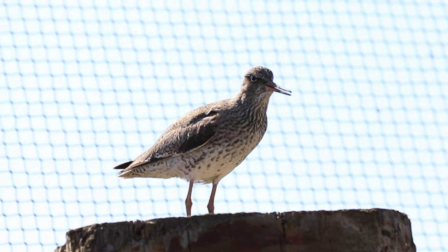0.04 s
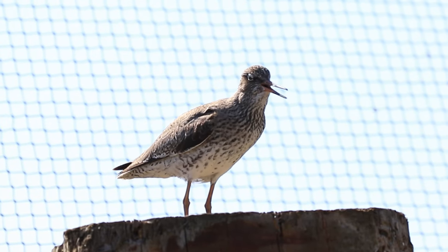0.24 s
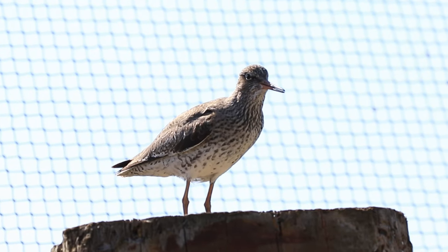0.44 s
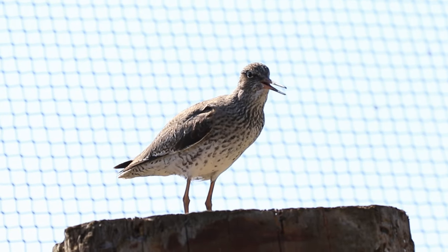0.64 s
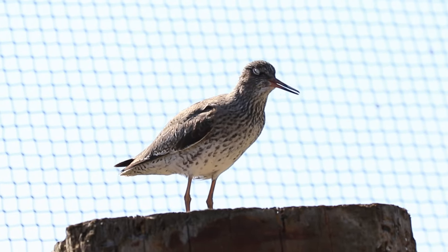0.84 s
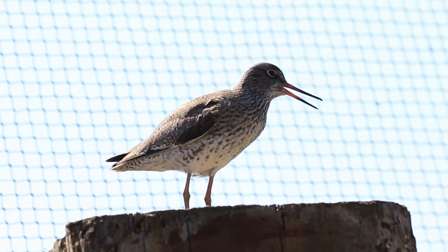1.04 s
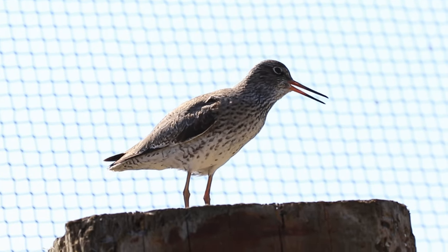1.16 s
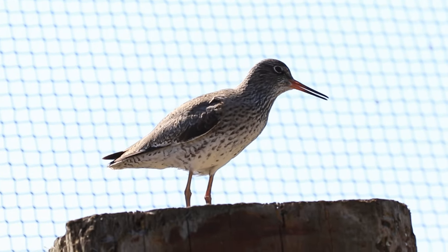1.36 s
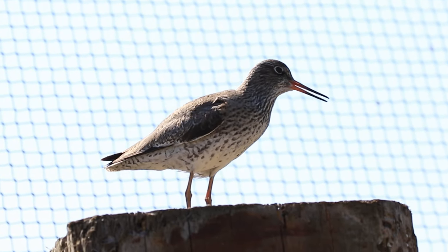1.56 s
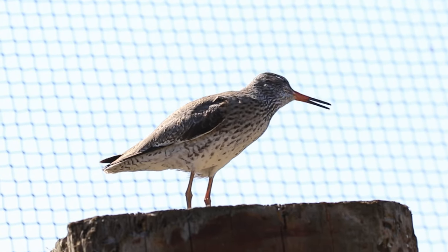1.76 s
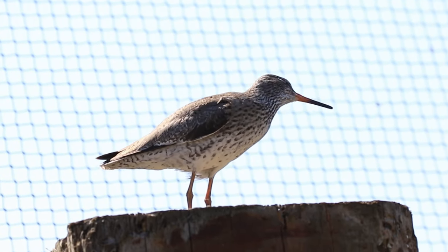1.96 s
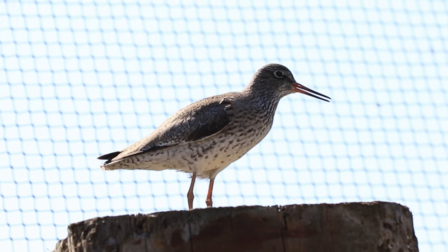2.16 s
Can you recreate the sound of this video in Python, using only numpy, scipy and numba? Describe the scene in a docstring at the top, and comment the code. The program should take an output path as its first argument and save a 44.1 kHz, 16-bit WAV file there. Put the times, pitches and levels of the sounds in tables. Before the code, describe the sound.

Close by outdoors, a wading bird pipes four short, high whistles, each starting with a tiny rasp and echoing briefly. Gusts rumble on the microphone with two soft thumps midway, over quiet air and faint distant chirps.

```python
"""A wading bird in an aviary

The bird whistles four times, close by. Each call opens with a short rasp and a reedy upslide, breaks
into a nearly pure tone that sags and recovers, and drops away. A wall reflects it and the aviary
reverberates. Other birds call faintly further off, and wind buffets the microphone over quiet air."""
import sys
import numpy as np
from scipy import signal
from scipy.fft import rfft, irfft
from scipy.io import wavfile
from scipy.ndimage import uniform_filter1d, minimum_filter1d
from numba import njit

SR = 44100
rng = np.random.default_rng(int(sys.argv[2]) if len(sys.argv) > 2 else 0)


def dump(signal):
    """Clip the signal to [-1, 1] and save it as 16-bit WAV at the path in sys.argv[1]."""
    limited = np.clip(np.atleast_2d(signal).T, -1, 1)
    pcm = np.round(limited * 32767).astype(np.int16)
    wavfile.write(sys.argv[1], SR, pcm)


N = 97020
T = np.arange(N) / SR
BREAK_S = .0025  # the upslide gives way to the pure tone within this time

# Pitch contour of a whistle (time after the break [s], frequency [Hz])
GLIDE = [(0, 2675), (.008, 2592), (.02, 2458), (.035, 2364), (.06, 2322), (.08, 2333), (.1, 2370),
         (.135, 2387), (.17, 2418), (.2, 2406)]
# Loudness contour of a whistle (share of its length [1], gain [dB])
EFFORT = [(0, 7.5), (.055, 6), (.115, 0.1), (.3, -0.95), (.5, -0.5), (.72, -0.5), (.9, -2.5), (1, -3.2)]
def whistle(t, length, offset_hz, rise_hz, db, swell_db, third_db, fourth_db, drop_db,
            drop_hz=700, drop_s=.0055, beak_close_s=.05, release_s=.008, fade_s=.006):
    """Frequency modulation: a tone sags, recovers and drops; upper harmonics fade as the beak closes."""
    late = np.maximum(t - length, 0)
    glide = curve(t, GLIDE)
    hz = (glide + offset_hz + rise_hz * ramp(t / length)) * (1 + .0035 * walk(83))
    hz -= drop_hz * (1 - np.exp(-late / drop_s))
    closing = ramp((t - length) / beak_close_s + 1)
    sag_db = 2 * ramp((GLIDE[-1][1] - glide) / 80)  # overtones gain a little where the pitch sags
    build_db = -12.5 * (1 - ramp(t / .02))
    fourth = fourth_db - 14 * closing + build_db + sag_db / 2 + 2 * walk(25)
    second = -41 + sag_db + 18 * ramp(late / drop_s) + 2 * walk(25)
    third = third_db - 7 * closing + 2 * walk(6.7)
    top = fourth + 8 * (1 - ramp(t / .055))  # the highest harmonics are strongest early
    tone = voice(hz, [0, second, third, fourth, top - 10, top - 18.5])
    held = ramp((length - t) / release_s + .5)
    envelope = ramp(t / BREAK_S) * (held + (1 - held) * amp(drop_db) * np.exp(-late / fade_s))
    swell = swell_db * ramp((t / length - .3) / .21)
    return tone * envelope * amp(db + curve(t / length, EFFORT) + swell + 1.86 * walk(20))


# Harmonics of the rasp, from the fundamental up (relative level [dB])
RASP_HARMONICS = [-13.5, -5, 0, -15, -20.5, -25.5, -34, -27.5, -27, -48, -47.5, -54]
# Pitch contour of the upslide (time before the break [s], frequency [Hz])
UPSLIDE = [(.0155, 2085), (.010, 2115), (.005, 2210), (0, 2420)]
# Harmonics of the upslide, from the second up (relative level [dB])
UPSLIDE_OVERTONES = [-9, -19, -28, -42, -53.5, -58]
# Spectrum of the crack at the break (frequency [Hz], relative level [dB])
CRACK_SPECTRUM = [(1000, -38), (2400, -8), (4700, 0.5), (6200, -12), (9300, -1), (11000, -23),
                  (12700, -17.5), (15000, -44)]
def onset(t, rasp_hz=1100, rasp_lead_s=.0238, rasp_s=.0098, edge_s=.00093, flare_s=.00093, crack_s=.0022):
    """Attack transient: jitter and shimmer roughen a rasp and an upslide, then the voice cracks."""
    rasp = voice(rasp_hz * (1 + .0349 * walk(900)), RASP_HARMONICS)
    rasp *= ramp((t + rasp_lead_s) / edge_s) * ramp((rasp_s - rasp_lead_s - t) / edge_s) * amp(-26.5)
    flare_db = 4 * np.exp(-(t / flare_s) ** 2)  # overtones and jitter flare at the break
    hz = curve(-t, UPSLIDE[::-1]) * (1 + .007 * amp(flare_db) * walk(600))
    slide = voice(hz, [0] + [db + flare_db for db in UPSLIDE_OVERTONES])
    slide *= ramp((t + UPSLIDE[0][0]) / edge_s) * ramp(-t / BREAK_S + .5) * amp(-21)
    crack = noise(CRACK_SPECTRUM) * np.exp(-(t / crack_s) ** 2) * amp(-30)
    return (rasp + slide) * amp(2.4 * walk(430)) + crack


# Calls (time of the break [s], length [s], pitch offset [Hz], pitch rise [Hz], base level [dB],
# swell [dB], third harmonic [dB], fourth harmonic [dB], closing drop [dB])
CALLS = [(.1845, .195, 24, -30, -14.3, 3.4, -45, -36, -17), (.6732, .194, 1, -1, -14, 3.3, -46, -36, -13),
         (1.1262, .201, -7, 14, -14.8, -.3, -32, -38.5, -13),
         (1.6882, .2315, -1, 5, -15, -.3, -35, -30, -20)]
def wading_bird():
    """Superposition: each call is a rough transient joined to a sustained whistle."""
    return sum(onset(T - time) + whistle(T - time, *shape) for time, *shape in CALLS)


# Discrete reflections (delay [s], gain [dB])
ECHOES = [(0.019, -19), (0.0424, -28.5), (0.0902, -17.5), (0.1504, -32)]
def aviary(x, t60_s=.7, tail_db=-26.5, cutoff_hz=3870):
    """Reflection: distinct echoes and a diffuse tail return duller than the direct sound."""
    wet = reverb(x, t60_s, build_s=.04) * amp(tail_db)
    for delay, db in ECHOES:
        wet += amp(db) * np.pad(x, (int(delay * SR), 0))[:N]
    return lowpass(wet, cutoff_hz)


# Distant chirps (time [s], length [s], start pitch [Hz], end pitch [Hz], level [dB],
# second harmonic [dB], third harmonic [dB])
CHIRPS = [(1.961, 0.023, 3035, 2703, -32.5, -42, -14.5), (1.984, 0.019, 3793, 3600, -44, -7, -34),
          (2.004, 0.0257, 3000, 2680, -51.5, -40, -2), (2.034, 0.037, 5890, 4600, -56, -30, -30),
          (2.057, 0.096, 4750, 4655, -56.5, -26, -30), (0.4, .06, 3700, 1800, -48.5, -22.5, -13.5),
          (0.37, 0.027, 1400, 1300, -54, -27, -29), (0.61, .11, 2200, 2162, -55.5, -17.5, -30),
          (1.052, .04, 6280, 5270, -57.5, -30, -28), (1.36, .11, 8400, 8220, -62.5, -40, -38),
          (2.171, 0.0224, 2400, 2343, -37, -33, -31)]
# Harmonics of the distant honk, from the fundamental up (relative level [dB])
HONK_HARMONICS = [-24, -20, 1, -7.5, 2.5, -14, -3.5]
def other_birds(edge_s=.0017, honk_start_s=.31, honk_s=.22, honk_hz=263.6, cutoff_hz=3870):
    """Reverberant field: distance blurs slurred chirps and one honk, adding a strong, dull tail."""
    direct = np.zeros(N)
    for start, length, from_hz, to_hz, db, second_db, third_db in CHIRPS:
        t = T - start
        hz = (from_hz + (to_hz - from_hz) * ramp(t / length)) * (1 + .0054 * walk(120))
        envelope = ramp(t / edge_s) * ramp((length - t) / edge_s)
        direct += voice(hz, [0, second_db, third_db]) * envelope * amp(db)
    progress = (T - honk_start_s) / honk_s
    hz = (honk_hz - 12 * ramp(progress)) * (1 + .0023 * walk(69))
    direct += voice(hz, HONK_HARMONICS) * ramp(progress * 10) * ramp((1 - progress) * 2) * amp(-47)
    return direct + lowpass(reverb(direct, t60_s=.42, build_s=.0033), cutoff_hz)


# Gust envelope (time [s], level [dB])
GUSTS = [(0, -54.5), (.16, -40.5), (.22, -71), (.41, -46), (.475, -27.5), (.52, -46.5), (.57, -29.5),
         (.7, -43.5), (.88, -36.5), (1.05, -42), (1.18, -34), (1.245, -21), (1.27, -24), (1.405, -16.5),
         (1.49, -31), (1.525, -23), (1.575, -39), (1.625, -25), (1.77, -50), (1.85, -25), (1.885, -23.5),
         (1.915, -63), (2.15, -46.5), (2.19, -27)]
# Spectrum of the eddies (frequency [Hz], relative level [dB])
WIND_SPECTRUM = [(15, -38), (25, -22), (96, -4), (179, -5), (329, -11.5), (536, -19.5), (603, -25.5),
                 (934, -33), (1050, -50.5), (1400, -39.5), (1820, -70.5), (3080, -120)]
# Pressure pulses of wind on the microphone (time [s], width [s], level [dB])
THUMPS = [(1.009, 0.0014, -6), (1.0931, 0.0014, -12.5)]
def wind(dull_hz=207, fully_bright_db=-18.5, flutter_db=3.08, grit_db=-6):
    """Turbulence at the microphone: a fluttering rumble that brightens in strong gusts, and thumps."""
    gust_db = curve(T, GUSTS)
    eddies = noise(WIND_SPECTRUM)
    dull = lowpass(noise(WIND_SPECTRUM), dull_hz)
    brightness = ramp(1 + (gust_db - fully_bright_db) / 10)
    rumble = np.sqrt(brightness) * eddies + np.sqrt(1 - brightness) * dull / dull.std()
    pressure = rumble * amp(gust_db + flutter_db * walk(24))
    for time, width, db in THUMPS:
        u = (T - time) / width
        pressure += amp(db) * np.exp(-u ** 2 / 2) * (u ** 2 - 1 + amp(grit_db) * eddies)
    return pressure


# Spectrum of the outdoor air (frequency [Hz], relative level [dB])
AIR_SPECTRUM = [(25, -25), (70, -7), (200, -2), (500, -2), (1000, -4.5), (2000, -6), (3300, -13),
                (5000, -20.5), (9000, -25), (12000, -34), (16000, -34)]
def background(air_db=-42.5, ring_hz=2370, bandwidth_hz=135):
    """Ambient noise: broadband air, and the narrow band of an earlier whistle still ringing far off."""
    ring_db = np.maximum(-37.5 - 15 * T, -47)
    ring = voice(np.full(N, ring_hz), [ring_db]) * walk(bandwidth_hz / 2)
    return noise(AIR_SPECTRUM) * amp(air_db + walk(3.5)) + ring


def amp(db):
    """Amplitude ratio of a level in decibels."""
    return 10 ** (np.asarray(db) / 20)


def curve(x, rows):
    """Linear interpolation between breakpoints."""
    return np.interp(x, *np.array(rows, float).T)


def ramp(x):
    """Raised-cosine step from 0 to 1."""
    return np.sin(np.pi / 2 * np.clip(x, 0, 1)) ** 2


def walk(rate_hz):
    """Random modulation: low-passed noise of unit standard deviation."""
    f = np.arange(N // 2 + 1) * SR / N
    y = irfft(rfft(rng.standard_normal(N)) / (1 + (f / rate_hz) ** 4), N)
    return y / y.std()


def noise(spectrum):
    """Spectral shaping: unit-level noise follows (frequency [Hz], level [dB]) and rolls off outside."""
    hz, db = np.array(spectrum, float).T
    f = np.arange(N // 2 + 1) * SR / N + 1
    shape = amp(np.interp(np.log(f), np.log(hz), db))
    skirts = np.minimum(f / hz[0], 1) * np.minimum(hz[-1] / f, 1) ** 2
    y = irfft(rfft(rng.standard_normal(N)) * shape * skirts, N)
    return y / y.std()


def lowpass(x, hz):
    """Second-order low-pass filter."""
    return signal.sosfilt(signal.butter(2, hz, fs=SR, output="sos"), x)


def voice(hz, harmonics_db):
    """Harmonic series: sinusoids at whole multiples of a moving fundamental."""
    phase = 2 * np.pi * (np.cumsum(hz) / SR + rng.random())
    partials = (amp(db) * np.sin(k * phase) * (k * hz < SR / 2) for k, db in enumerate(harmonics_db, 1))
    return np.sqrt(2) * sum(partials)


def reverb(x, t60_s, build_s):
    """Diffuse reverberation: convolution with noise that builds up and decays exponentially."""
    tail = rng.standard_normal(N) * np.exp(-np.log(1000) * T / t60_s) * ramp(T / build_s)
    return signal.fftconvolve(x, tail / np.linalg.norm(tail))[:N]


@njit
def peak_follower(x, decay):
    """Envelope detection: instant attack and exponential release."""
    envelope, peak = np.empty(len(x)), 0.
    for i in range(len(x)):
        peak = max(abs(x[i]), peak * decay)
        envelope[i] = peak
    return envelope


def scene():
    """Superposition of the birds, their reflections, wind and air in one channel."""
    birds = other_birds() + wading_bird()
    return (birds + aviary(birds) + wind() + background())[None]


def record(dry, threshold_db=-5.5, release_s=.03, cutoff_hz=15900):
    """Peak limiting holds down the loudest moments; a steep low-pass limits the bandwidth."""
    peak = peak_follower(dry[0], np.exp(-1 / (release_s * SR)))
    gain = np.minimum(1, amp(threshold_db) / (peak + 1e-9))
    gain = uniform_filter1d(minimum_filter1d(gain, size=64), size=64)
    return signal.sosfilt(signal.ellip(10, .1, 80, cutoff_hz, fs=SR, output="sos"), dry * gain)


dry = scene()
out = record(dry)
dump(out)
```